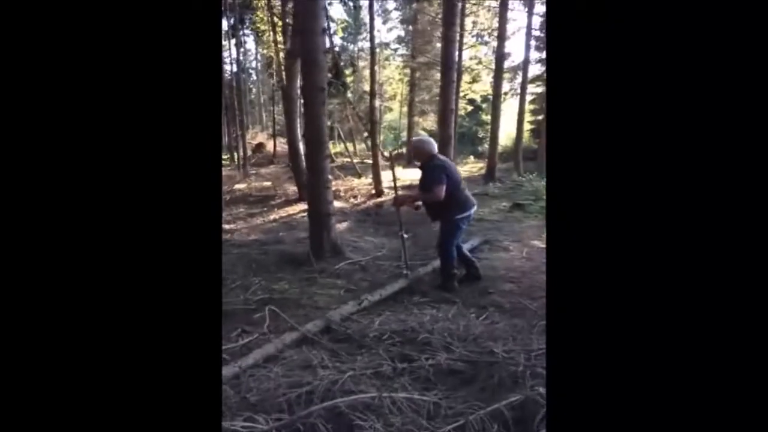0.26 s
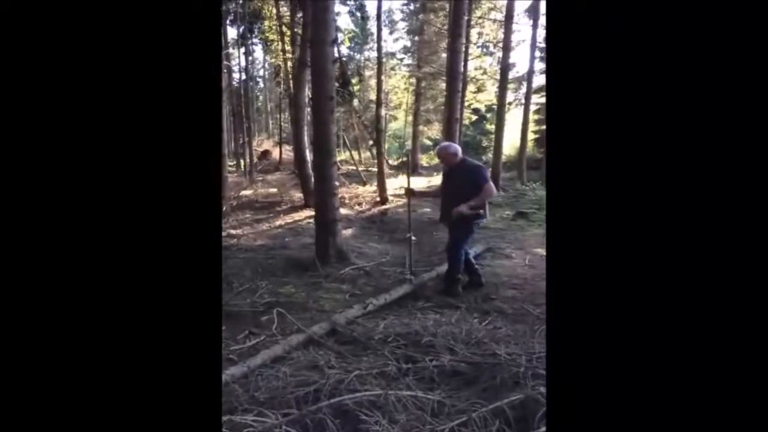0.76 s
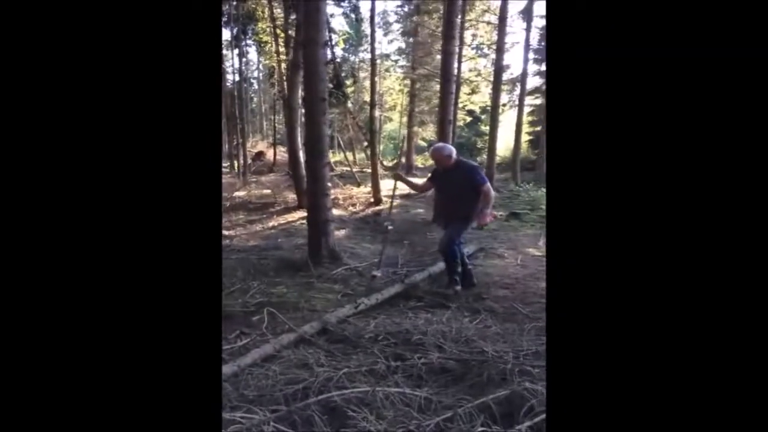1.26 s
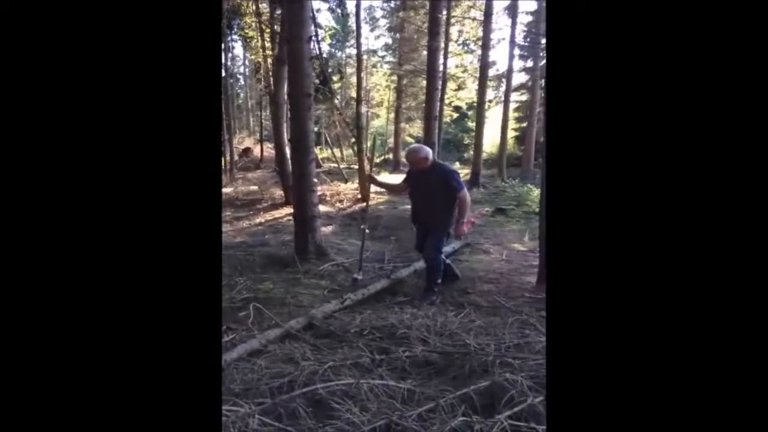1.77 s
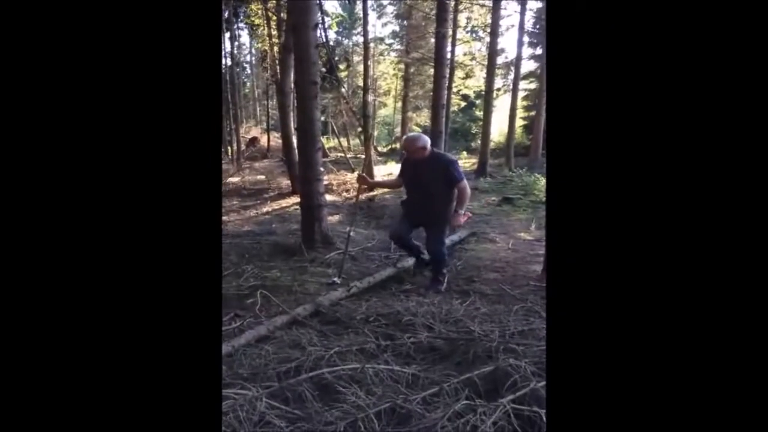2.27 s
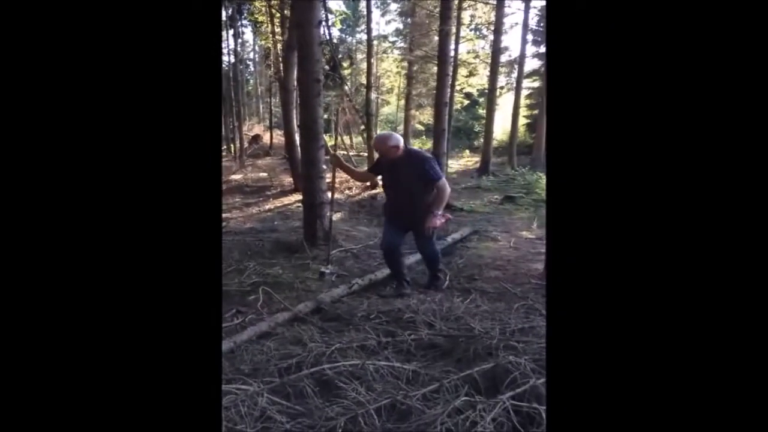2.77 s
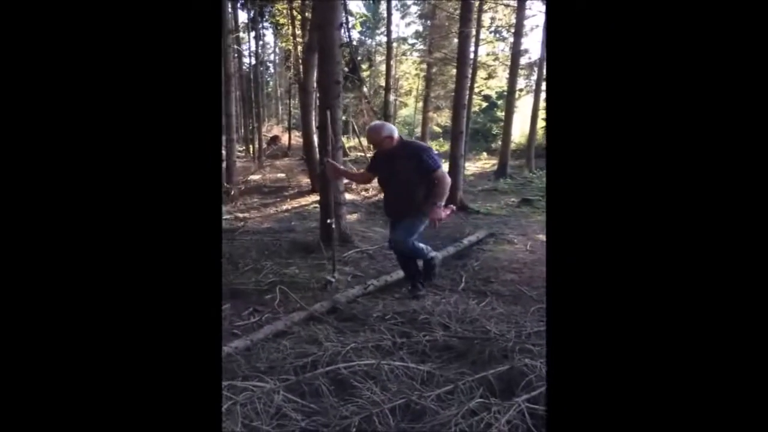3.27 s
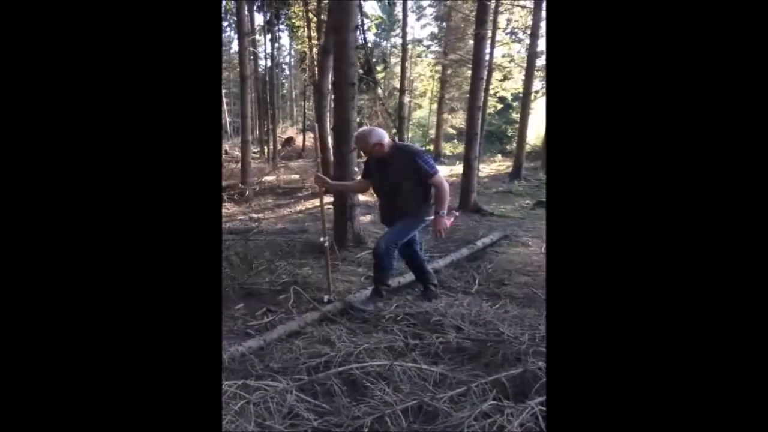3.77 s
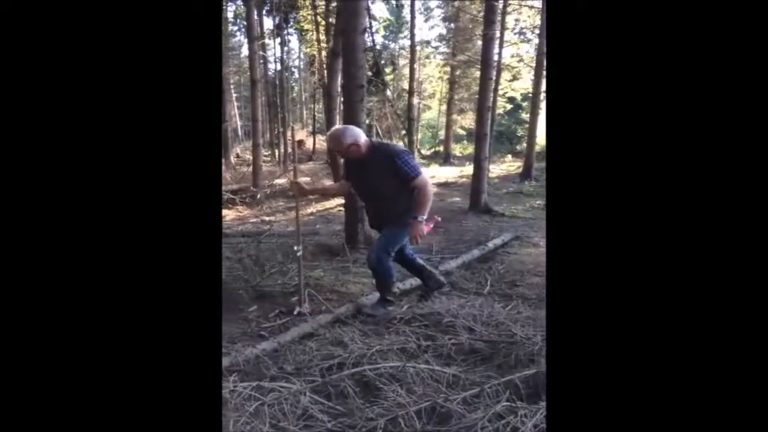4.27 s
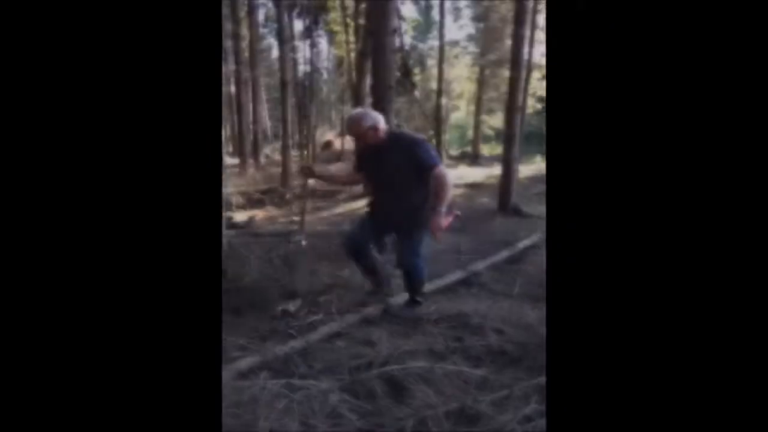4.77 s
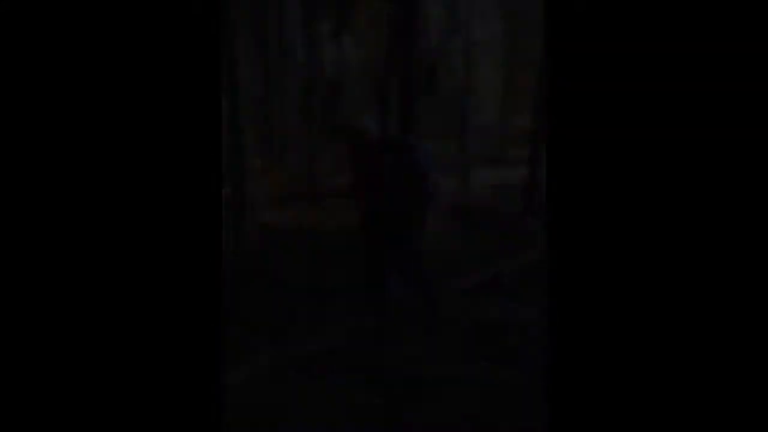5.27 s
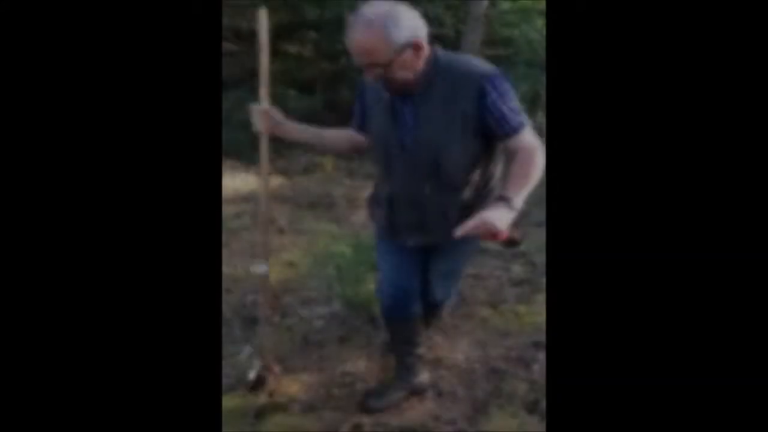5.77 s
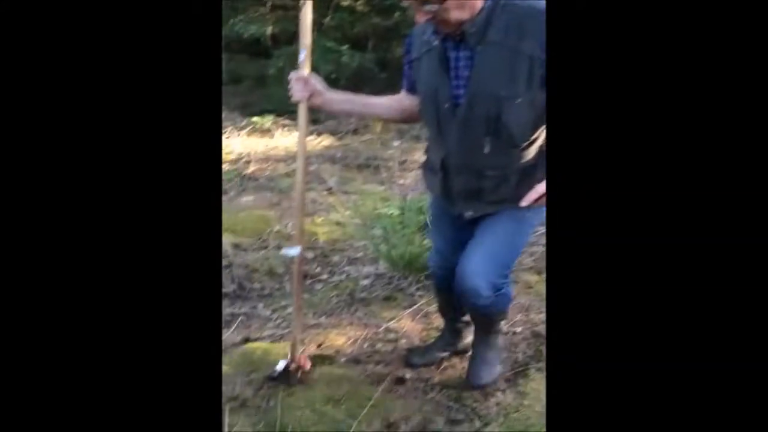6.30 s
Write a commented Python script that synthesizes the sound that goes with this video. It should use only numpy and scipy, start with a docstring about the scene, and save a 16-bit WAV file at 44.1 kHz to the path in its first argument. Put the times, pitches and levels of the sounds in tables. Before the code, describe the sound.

A quiet forest with faint, steady low rumble and fine restless needle rustle. A thin distant bird whistle sounds from 0 to 0.3 s, slightly blurred by the trees. Twigs tick from 0.4 s, with a soft step and rustle near 0.6 s. From 1.5 to 2.1 s a flurry of dry, bright snaps breaks out, strongest around 1.6 and 1.8 s. Between 2.1 and 3.4 s come soft thuds, light crunches, small ticks and faint bird chirps. From 3.7 s steps are heavier and crunchier, as if closer. Sharp snaps crack at 4.3 and 4.55 s, with a firm thud at 4.65 s. At 5.16 s a thick branch breaks, the loudest event, hard and woody with a short scattered echo. Snaps continue to 5.8 s as a dull stir swells. Around 6.05 s a boot sweeps through low growth with a rubbing scuff, a soft thud at 6.1 s and last faint ticks before ending at 6.5 s.

```python
"""Footsteps on pine needles: a far whistle opens over low rumble and restless litter, then twigs tick.
Soft steps thud and crunch, twigs snap in a flurry, and the later steps land harder, as if coming closer.
Two sharp snaps lead to a thick branch breaking; then one boot sweeps through low growth over a dull stir.
Cracks are split-second noise bursts with ringing and scattered echoes; litter is random grains in noise.
Boots rub as gliding bands of noise, birds are gliding sines with a noise echo, and air is shaped noise."""
import sys
import numpy as np
from scipy import signal
from scipy.fft import rfft, irfft, next_fast_len
from scipy.io import wavfile
from scipy.ndimage import uniform_filter1d, map_coordinates

SR = 44100
rng = np.random.default_rng(int(sys.argv[2]) if len(sys.argv) > 2 else 0)


def wav_record(signal):
    """Record a signal, one row per channel, as 16-bit PCM in the file named by sys.argv[1]."""
    frames = np.transpose(np.atleast_2d(signal))
    bounded = np.clip(frames, -1, 1)
    # unit amplitude maps onto the largest positive 16-bit level
    quanta = np.round(bounded * 32767).astype(np.int16)
    wavfile.write(sys.argv[1], SR, quanta)


N = 288414

# Twigs that snap clearly: start_s, level_db, thickness (0-1), ground_contact (0-1), sizzle_hz (band centre)
TWIG_SNAPS = [(0.394, -44, 0.66, 0.89, 8200), (0.5435, -49.5, 0.45, 0.69, 9700),
              (0.587, -53.5, 0.96, 1, 11700), (0.6712, -55.5, 0.62, 0.68, 10300),
              (0.9451, -53, 0.64, 0, 7100), (0.954, -53.5, 0.67, .4, 7400), (1.258, -54, 1, 0.54, 5900),
              (1.3524, -52.5, 0.43, .4, 5900), (1.5131, -50.5, 0.21, 1, 8900),
              (1.5308, -49.5, .05, .8, 8600), (1.5631, -33, 0.18, 0.83, 8400),
              (1.6525, -47.5, 0.24, 0.8, 10000), (1.6603, -37.5, 0.42, .7, 9700),
              (1.7818, -40, 0.45, 0, 8800), (1.7874, -32, 0.36, 0, 8800), (1.8356, -35.5, 0.42, 0.4, 8900),
              (1.8837, -35.5, 0.44, 0.04, 7880), (1.9929, -50, 0.38, 0.41, 7850),
              (2.0781, -43.5, 0.3, 0.08, 8850), (2.15, -52, 0.47, .7, 9850),
              (2.2218, -51.5, 0.38, .4, 9700), (2.3108, -56, 0.26, 0.4, 9600), (2.3362, -45, 1, 0.49, 8100),
              (2.459, -63, .8, .5, 9000), (2.4742, -55, 0.73, 0.57, 7600), (2.533, -54, 0.56, 0, 7900),
              (2.6076, -49.5, 0.43, 1, 6560), (2.6914, -52, 0.43, 0.87, 7830),
              (2.7344, -56, 0.49, .8, 10500), (3.035, -41.5, 0.53, 0.75, 9300),
              (3.076, -50.5, 0.65, 0, 8900), (3.2023, -52.5, 0.3, .5, 8700),
              (3.3766, -41, 0.38, 0.54, 8200), (3.7367, -45.5, 0.26, 1, 11450),
              (3.77, -41.5, 0.4, 0.11, 6570), (3.7879, -43, 0.13, 0.26, 9040), (3.8019, -50, 0.43, 0, 6400),
              (3.8343, -47, 0.41, .85, 7800), (3.897, -47, 0.63, 0.78, 12100), (4.0423, -48, 0.33, 0, 8170),
              (4.0649, -46, .15, 0, 6480), (4.2437, -41, 0.71, 0.28, 8570), (4.2823, -43, 0.7, 0, 8200),
              (4.3126, -26.5, 0.46, 0, 10000), (4.3364, -41.5, 0.7, 0, 9000),
              (4.404, -49.5, 0.62, 0.26, 8000), (4.5564, -27, 0.44, 0.5, 10900),
              (4.6592, -42.5, 0.48, 0.8, 8900), (5.007, -57, 0.48, 0.08, 7400),
              (5.0222, -49, 0.1, 0.12, 8450), (5.06, -43.5, 0.54, .65, 10760),
              (5.1446, -39.5, .75, 0, 10000), (5.237, -39, 0.47, 0.45, 7400), (5.3703, -40.5, 0, .15, 9050),
              (5.4451, -35.5, 0.42, 0.2, 8930), (5.4772, -42.5, 0.63, 0.58, 8950),
              (5.5776, -39, .53, 1, 10100), (5.7647, -47.5, 0.45, 0.1, 11800), (6.142, -49, 0.77, 0, 8700),
              (6.2223, -50, 0.6, 0.3, 10000)]
# Knock, body and crack bands of a twig: low_hz, high_hz
TWIG_BANDS = [(180, 550), (750, 2740), (2400, 4860)]
# Fibre bundles of the thick branch giving way: start_s, level_db, split_ms
BRANCH_FIBRES = [(5.1574, -26.5, 0.38), (5.1583, -26.5, 0.067), (5.1594, -15.5, 0.107),
                 (5.1597, -24.5, 0.19), (5.1625, -27.5, 0.11), (5.1619, -27, 0.027)]
# Resonances of the branch wood: centre_hz, width_hz, level_db
BRANCH_MODES = [(520, 30, -11), (883, 170, 4.5), (1600, 150, 0.5), (2074, 82, -10.5), (2730, 420, 4),
                (3240, 490, 4.5), (3905, 200, 3.5), (4300, 33, 7.5), (4820, 150, 6.5), (4763, 170, 13),
                (6230, 610, -4.5), (8050, 210, -2)]
# Soles pressing the litter: peak_s, thud_db, crunch_db, rise_s
STEPS = [(0.571, -71.5, -61, 0.04), (1.496, -64, -56.5, 0.021), (1.812, -69, -62.5, 0.0095),
         (2.31, -55, -58, 0.022), (2.601, -61.5, -64, 0.06), (3.09, -62.5, -58.5, 0.028),
         (3.769, -48, -47, 0.02), (4.323, -56.5, -49, 0.064), (4.656, -43.5, -49, 0.0029),
         (5.016, -54.5, -48, 0.0051), (5.132, -52.5, -40, 0.0025), (5.17, -46, -41, 0.0067),
         (5.208, -54, -89, 0.0047), (6.114, -48.5, -55, 0.0243)]
# Spectrum of a sole on soft ground, also of the dull stir: freq_hz, level_db (per Hz, relative)
THUD_SPECTRUM = [(30, -9.5), (80, 2), (160, 3.5), (240, -6), (400, -11.5), (900, -29.5), (3000, -66)]
# Spectrum of crushed litter: freq_hz, level_db (per Hz, relative)
CRUNCH_SPECTRUM = [(100, -25), (300, -8.5), (900, -10), (2500, -1), (4500, -2), (8000, -3), (12000, -5),
                   (15000, -12)]
# Boots and trouser legs rubbing: start_s, length_s, start_hz, middle_hz, end_hz, level_db
SCUFFS = [(0.459, 0.121, 1500, 1219, 1380, -67), (1.248, 0.021, 1305, 1500, 1500, -56),
          (1.385, 0.0554, 407, 494, 420, -64.5), (2.542, 0.097, 600, 525, 692, -68),
          (2.914, 0.102, 1008, 970, 1062, -71.5), (6.018, 0.034, 1000, 1180, 1130, -58),
          (6.049, 0.0974, 1606, 2003, 1874, -56.5), (6.146, 0.067, 1870, 1665, 1409, -60.5)]
# Level of restless needles and clothes: time_s, level_db
SHUFFLE_LEVEL = [(0.0, -68.5), (0.22, -67), (0.53, -58), (0.69, -73.5), (1.18, -69), (1.73, -63),
                 (2.17, -72), (2.33, -77), (2.48, -64.5), (3.48, -73.5), (3.73, -70), (3.88, -67.5),
                 (5.04, -62), (5.19, -64), (5.5, -62.5), (6.14, -62.5), (6.47, -67.5), (6.54, -72.5)]
# Spectrum of shifting needles: freq_hz, level_db (per Hz, relative)
NEEDLE_SPECTRUM = [(100, -14.5), (300, -1.5), (800, -2), (2000, 0), (4000, -0.5), (7000, -1.5),
                   (11000, -2.5), (15000, -3)]
# A boot sweeping through low growth: peak_s, level_db, rise_s
SWISHES = [(.57, -64.5, 0.08), (5.801, -61, 0.57), (6.049, -53, 0.039)]
# Spectrum of brushed growth: freq_hz, level_db (per Hz, relative)
GROWTH_SPECTRUM = [(200, -52), (600, -2), (1200, -6.5), (1900, -5.5), (2700, -7), (5000, -10.5),
                   (15000, -10)]
# Whistles of far birds: start_s, length_s, start_hz, end_hz, level_db
BIRD_WHISTLES = [(0, 0.284, 3300, 3188, -62.5), (.01, 0.051, 2792, 2984, -64.5),
                 (1.6, .053, 4000, 3820, -74), (2.36, .1, 3950, 3840, -79), (2.713, 0.039, 4683, 3400, -76),
                 (2.831, 0.026, 4300, 3870, -83), (3.151, 0.021, 4260, 3690, -73),
                 (3.425, 0.055, 5130, 4820, -70.5), (3.479, 0.024, 4264, 3770, -72.5),
                 (4.107, .06, 5000, 4680, -70)]
# Level of the dull stir of ground and air: time_s, level_db
STIR_LEVEL = [(0.0, -73.5), (4.33, -75.5), (4.59, -68), (4.81, -64), (5.77, -59), (6.25, -66.5),
              (6.54, -65)]
# Spectrum of the rumbling air: freq_hz, level_db (per Hz, relative)
AIR_SPECTRUM = [(15, -22.5), (30, -32.5), (42, -1), (57, 5), (80, -9), (130, -13), (250, -22.5),
                (600, -23.5), (1500, -30), (4000, -35.5), (15000, -63.5)]

# Twig balance against the sizzle before the shared level is set: (thinnest dB, thickest dB)
BODY_DB, CRACK_DB = (-35, 17.5), (-31.5, 4)
KNOCK_DB = (-32.5, 4)  # knock against the body: (lying free dB, pressed to the ground dB)
SPLIT_MS = (.08, .25)  # time for a split to reach full force: (thinnest twig, thickest twig)
# Small twigs around each step: delay and scatter in time, level and scatter, sizzle centre
TICK_LAG_S, TICK_SPREAD_S, TICK_DB, TICK_SPREAD_DB, TICK_HZ = 0.011, 0.045, -61, 2, 8550
SETTLE_S = 0.055  # fade time of the litter settling under a sole
SPRING_BACK_S = .11  # fade time of the growth coming to rest behind the boot
GLIDE_S = 0.0112  # time constant of a whistle sliding onto its final pitch
TOP_HZ = 15250  # band limit of the microphone


def amp(db):
    """Turn decibels into a gain factor."""
    return 10 ** (np.asarray(db) / 20)


def unit(x):
    """Scale x to rms 1."""
    return x / np.sqrt(np.mean(x ** 2) + 1e-20)


def burst(x):
    """Scale a short sound to the energy of 5 ms at rms 1."""
    return x * np.sqrt(.005 * SR / (np.sum(x ** 2) + 1e-20))


def curve(rows):
    """Draw straight lines through (time, value) rows, one value per sample."""
    return np.interp(np.arange(N) / SR, *np.transpose(rows))


def between(ends, share):
    """The value a share of the way from one end to the other."""
    return ends[0] + (ends[1] - ends[0]) * np.clip(share, 0, 1)


def wobble(rate, size):
    """A smooth random curve with rate knots a second."""
    knots = rng.standard_normal(int(size * rate / SR) + 4)
    return map_coordinates(knots, [np.arange(size) * rate / SR])


def swell(s, rise, fade):
    """A push that builds up until time s and then dies away exponentially."""
    t = np.arange(N) / SR - s
    return np.exp(-np.minimum(np.where(t < 0, (t / rise) ** 2, t / fade), 20))


def filtered(x, response):
    """Filter x by a complex response of frequency."""
    m = next_fast_len(len(x) + min(len(x) // 4, 8192))  # padding gives the tail room
    return irfft(rfft(x, m) * response(np.fft.rfftfreq(m, 1 / SR)), m)[:len(x)]


def coloured(x, spectrum):
    """Shape x by a (Hz, dB) spectrum and scale it to rms 1."""
    f, db = np.transpose(spectrum)
    return unit(filtered(x, lambda hz: amp(np.interp(np.log(hz + 1), np.log(f), db))))


def ringing(x, modes):
    """Excite (Hz, width Hz, dB) resonances with x, in alternating polarity."""
    def response(f):
        total = 0
        for k, (centre, width, db) in enumerate(modes):
            mode = 1j * f * width / (centre * centre - f * f + 1j * f * width)
            total = total + (-1) ** k * amp(db) * mode
        return total
    return filtered(x, response)


def add(track, s, x):
    """Mix x into the track at time s."""
    part = track[round(s * SR):][:len(x)]
    part += x[:len(part)]


def tear(t, split_ms):
    """A noise burst of tearing fibres: it starts at t = 0 and is strongest after split_ms."""
    u = np.maximum(t, 0) * 1000 / split_ms
    return burst(u * np.exp(-u) * rng.standard_normal(len(t)))


def even(x, width_hz):
    """Brittle fracture spreads its energy evenly: flatten the spectrum smoothed over width_hz."""
    z = rfft(x)
    power = uniform_filter1d(np.abs(z) ** 2, max(1, int(width_hz * len(x) / SR)))
    return burst(irfft(z / np.sqrt(np.abs(power) + 1e-12), len(x)))


def scatter(t, near_s, falloff, t60):
    """Echoes of a fracture at t = 0 from ground and trunks: lumpy noise that weakens with delay."""
    t = np.maximum(t, 0)
    lumps = amp(wobble(500, size=len(t)) - 60 * t / t60)
    onset = 1 - np.exp(-t / 0.00029)
    return burst(rng.standard_normal(len(t)) * lumps * onset * (1 + t / near_s) ** -falloff)


def crackle(rate, spread_db, hiss_db):
    """Tiny fractures of very unequal size, rate a second, on a noise bed of rubbing."""
    hits = (rng.random(N) < rate / SR) * rng.choice([-1, 1], N)
    sizes = amp(spread_db * np.minimum(rng.exponential(size=N), 4))
    return unit(hits * sizes) + amp(hiss_db) * rng.standard_normal(N)


def twigs(ring_db):
    """Thick twigs knock, thin ones only sizzle: each fracture has its own balance and brief ring."""
    out = np.zeros(N)
    t = np.arange(4096) / SR - .003
    for s, level_db, thickness, contact, sizzle_hz in [*TWIG_SNAPS, *ticks(count=2)]:
        crack = even(tear(t, between(SPLIT_MS, thickness)), width_hz=710)
        crack += amp(-3) * scatter(t, near_s=.002, falloff=1.05, t60=.35)
        crack += amp(-14) * tear(t + 0.0016, split_ms=0.957)  # the outer fibres give way first
        mode_hz = np.geomspace(500, 12000, 10) * np.exp(.1 * rng.standard_normal(10))
        ring = ringing(crack, [(hz, 60 + .06 * hz, 0) for hz in mode_hz])
        crack = burst(crack) + amp(ring_db) * burst(ring)
        bands = [*TWIG_BANDS, (sizzle_hz / 1.62, sizzle_hz * 1.556)]
        for k, (band, db) in enumerate(zip(bands, balance(level_db, thickness, contact))):
            b, a = signal.butter(2, np.minimum(band, SR / 2 - 1), "band", fs=SR)
            polarity = (-1) ** k
            add(out, s + t[0], polarity * amp(db) * burst(signal.lfilter(b, a, crack)))
    return out


def ticks(count):
    """Each step also breaks a few small twigs around it; rows as in TWIG_SNAPS."""
    rows = []
    for step_s, *_ in STEPS:
        for _ in range(count):
            s = step_s + TICK_LAG_S + TICK_SPREAD_S * rng.normal()
            level_db = TICK_DB + TICK_SPREAD_DB * rng.normal()
            rows.append((s, level_db, rng.uniform(0.307, 0.61), rng.random(), TICK_HZ))
    return rows


def balance(level_db, thickness, contact):
    """Share a snap's level among knock, body, crack and sizzle (dB)."""
    body = between(BODY_DB, thickness)
    parts = np.array([body + between(KNOCK_DB, contact), body, between(CRACK_DB, thickness), 0])
    return level_db + parts - 20 * np.log10(np.linalg.norm(amp(parts)))


def branch(db, edge_db, echo_db):
    """Fibre bundles part within milliseconds and ring the wood; the forest answers, a little duller."""
    out = np.zeros(N)
    t = BRANCH_FIBRES[0][0] - .005 + np.arange(SR // 2) / SR
    splits = [amp(level) * even(tear(t - s, split_ms), width_hz=2800) for s, level, split_ms in BRANCH_FIBRES]
    crack = burst(sum(splits))
    loudest_s = BRANCH_FIBRES[2][0]
    echo = scatter(t - loudest_s, near_s=0.0077, falloff=1.28, t60=1.0)
    dull = signal.sosfilt(signal.butter(1, [600, 8000], "band", fs=SR, output="sos"), echo)
    wood = burst(ringing(crack + amp(echo_db) * echo, BRANCH_MODES))
    edge = crack + amp(echo_db) * dull
    add(out, t[0], amp(db) * burst(wood + amp(edge_db) * edge))
    return out


def footsteps():
    """Weight comes onto a sole: the soft ground thuds and the needles crunch."""
    weight, crush = np.zeros(N), np.zeros(N)
    for s, thud_db, crunch_db, rise in STEPS:
        press = swell(s, rise, SETTLE_S)
        weight += amp(thud_db) * press ** 2.5  # the thud is briefer than the crunch
        crush += amp(crunch_db) * press
    thud = weight * coloured(rng.standard_normal(N), THUD_SPECTRUM)
    return thud + crush * clumps(CRUNCH_SPECTRUM, clump_db=4)


def clumps(spectrum, clump_db):
    """Litter collapses in little clumps: tiny fractures with a randomly wavering level."""
    grains = crackle(rate=1500, spread_db=4, hiss_db=-5)
    return coloured(grains * amp(clump_db * wobble(120, size=N)), spectrum)


def scuffs(width):
    """Rubbing is a band of noise around a gliding pitch; width is relative to the middle pitch."""
    out = np.zeros(N)
    for s, length, start_hz, middle_hz, end_hz, db in SCUFFS:
        u = np.linspace(0, 1, int(length * SR))
        hz = np.interp(u, [0, .5, 1], [start_hz, middle_hz, end_hz])
        phase = 2 * np.pi * np.cumsum(hz) / SR
        rub = sum(wobble(width * middle_hz, size=len(u)) * wave(phase) for wave in (np.sin, np.cos))
        stroke = np.sqrt(np.abs(np.sin(np.pi * u)))
        add(out, s, amp(db) * unit(stroke * rub))
    return out


def rustle(flutter_db):
    """Needles shift as fluttering crackle, and low growth brushes the boots in swelling sweeps."""
    flutter = amp(flutter_db * wobble(35, size=N))
    needles = coloured(crackle(rate=280, spread_db=8, hiss_db=6), NEEDLE_SPECTRUM)
    sweep = sum(amp(db) * swell(s, rise, SPRING_BACK_S) for s, db, rise in SWISHES)
    growth = coloured(crackle(rate=2700, spread_db=32, hiss_db=8.0), GROWTH_SPECTRUM)
    return amp(curve(SHUFFLE_LEVEL)) * flutter * needles + sweep * growth


def birds(waver):
    """Thin wavering whistles are gliding sines, blurred by a decaying noise echo from the trees."""
    out = np.zeros(N)
    for s, length, start_hz, end_hz, db in BIRD_WHISTLES:
        u = np.linspace(0, 1, int(length * SR))
        glide_hz = end_hz + (start_hz - end_hz) * np.exp(-u * length / GLIDE_S)
        hz = glide_hz * (1 + waver * wobble(114, size=len(u)))
        breath = np.sqrt(np.abs(2 * np.sin(np.pi * u ** 0.38)))  # peaks early, then tapers
        add(out, max(s, 0), amp(db) * breath * np.sin(2 * np.pi * np.cumsum(hz) / SR))
    t = np.arange(SR // 3) / SR
    trees = rng.standard_normal(len(t)) * amp(-60 * t / 0.577)  # falls 60 dB in 0.577 s
    return out + signal.fftconvolve(out, trees / np.linalg.norm(trees))[:N]


def air():
    """Shaped noise makes a steady low rumble and a dull stir that swells late."""
    rumble = amp(-65.0) * coloured(rng.standard_normal(N), AIR_SPECTRUM)
    stir = amp(curve(STIR_LEVEL)) * coloured(rng.standard_normal(N), THUD_SPECTRUM)
    return rumble + stir


def scene():
    """The walker among birds and air."""
    walker = twigs(ring_db=-12) + branch(db=-14.5, edge_db=-4.5, echo_db=-8.0)
    walker += footsteps() + scuffs(width=0.76) + rustle(flutter_db=3.5)
    return (walker + birds(waver=0.0088) + air())[None]


def record(dry):
    """The microphone's steep low-pass takes away the treble above its band limit."""
    return signal.sosfilt(signal.ellip(10, .2, 80, TOP_HZ, fs=SR, output="sos"), dry)


dry = scene()
out = record(dry)
wav_record(out)
```